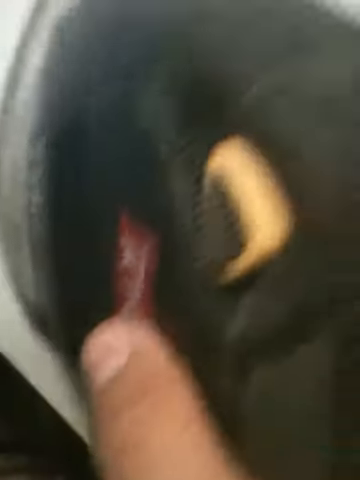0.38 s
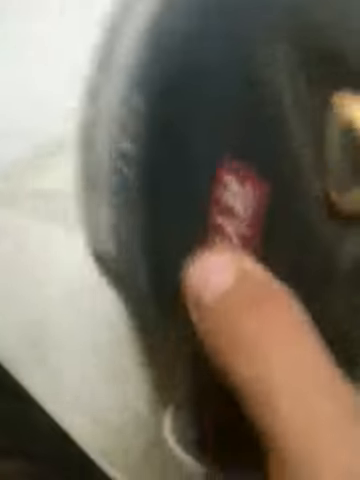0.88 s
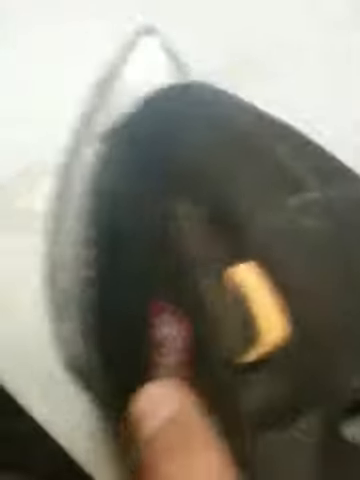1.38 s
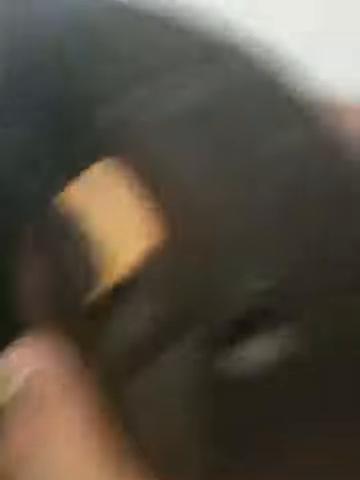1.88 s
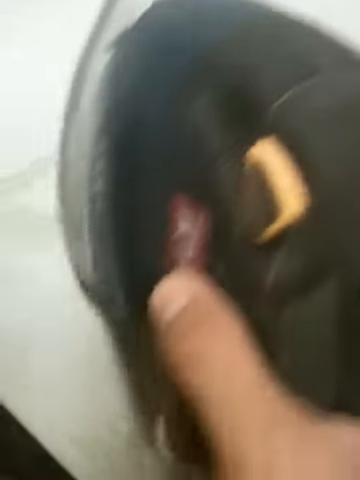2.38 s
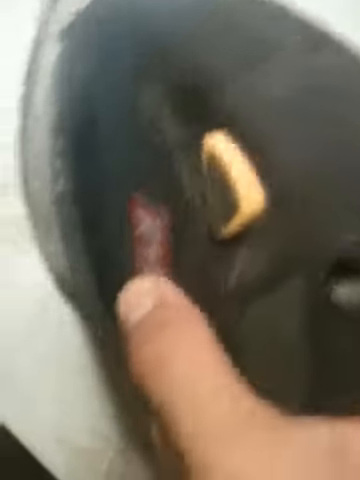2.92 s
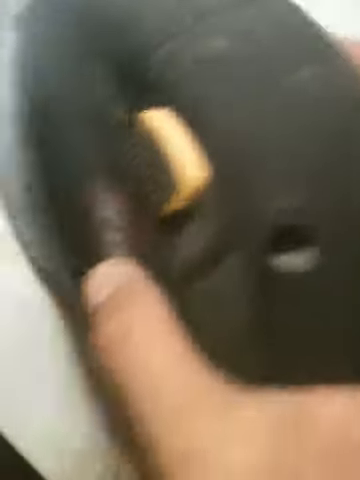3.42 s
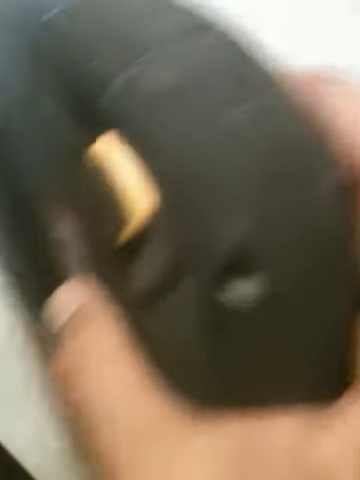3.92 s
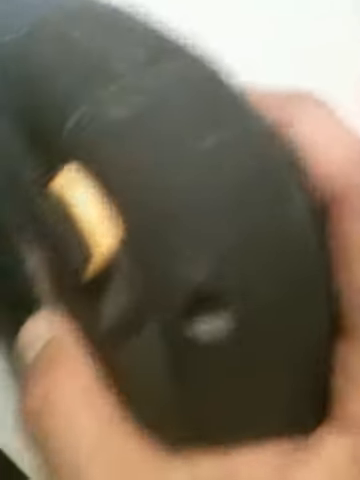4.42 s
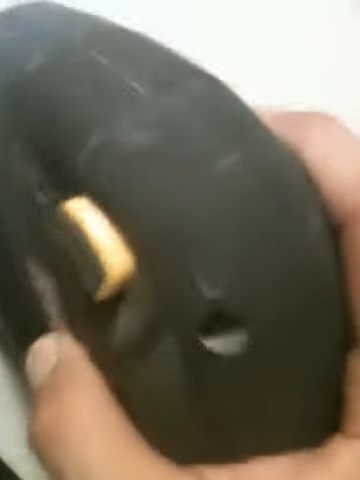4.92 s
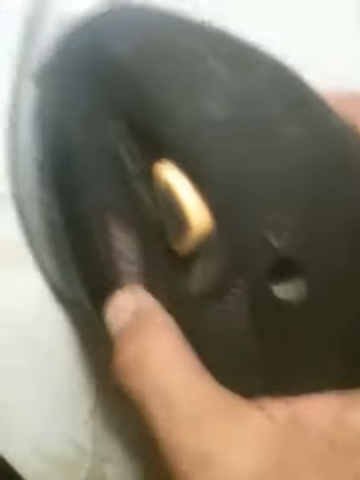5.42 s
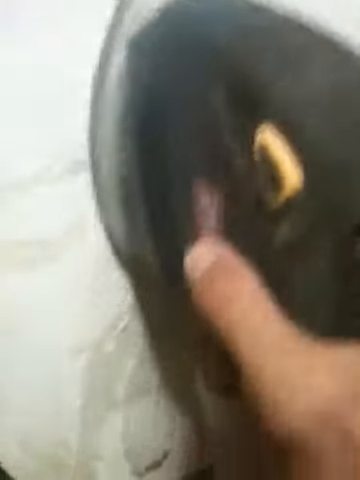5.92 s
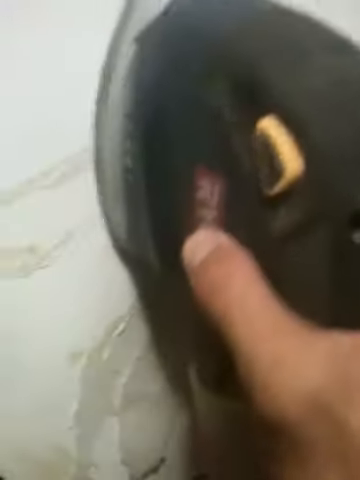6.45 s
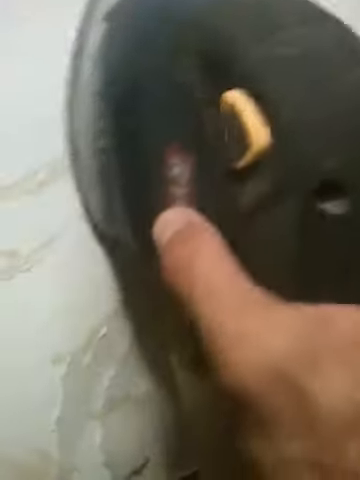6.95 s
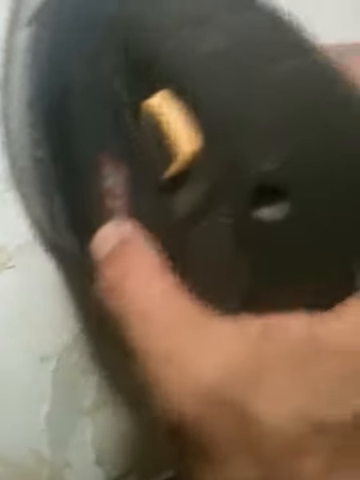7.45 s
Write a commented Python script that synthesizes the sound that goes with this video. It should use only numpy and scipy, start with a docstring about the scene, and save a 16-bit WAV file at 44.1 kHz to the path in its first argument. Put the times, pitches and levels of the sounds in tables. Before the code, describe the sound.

Continuous power-tool noise, near and dry, already running at the start and still running at the end. The motor's low buzz wavers in strength, with shifting metallic whines above it. Rough sanding hiss and rushing cooling air fill the upper range, easing for a moment where the hand slows, later becoming more even while the hum weakens and flutters.

```python
"""A humming motor and a bright hiss: a small orbital sander on a painted wall, close to a mono microphone.
The off-centre shaft hums once a turn; armature slots, commutator, fan and bearing sing multiples of it.
Grit scratches the paint as a bright hiss, which dips at turns of the stroke in the first five seconds.
Cooling air roars through the ringing housing. Tones are phase-locked sines; hiss and roar are shaped noise."""
import sys
import numpy as np
from scipy import signal
from scipy.io import wavfile
from scipy.ndimage import uniform_filter1d, map_coordinates

SR = 44100
rng = np.random.default_rng(int(sys.argv[2]) if len(sys.argv) > 2 else 0)


def decibels_to_gain(level_db):
    """Convert a level in decibels to a linear amplitude gain (20 dB per decade)."""
    exponent = np.asarray(level_db, float) / 20
    return 10 ** exponent


def generate_wav(sig):
    """Save sig (samples, or channels by samples) to the path in sys.argv[1] as 16-bit PCM at SR."""
    pcm = np.round(np.clip(np.atleast_2d(sig).T, -1, 1) * 32767).astype(np.int16)
    wavfile.write(sys.argv[1], SR, pcm)


N = 333837

# Shaft speed, dragged down by the load: t/s, f/Hz (turns per second)
SHAFT_SPEED = [(0, 192.9), (.3, 192.75), (.72, 193.05), (1.3, 192.45), (1.68, 191.5), (1.95, 191.45),
               (2.52, 190.05), (2.74, 190.35), (3.0, 189.75), (3.18, 190.05), (3.48, 189.6), (3.8, 190.75),
               (4.1, 189.85), (4.42, 190.35), (4.68, 189.9), (4.92, 190.4), (5.28, 189.8), (5.56, 190.25),
               (6.0, 188.8), (6.36, 188.6), (6.6, 187.8), (6.84, 187.65), (7.0, 187.1), (7.2, 187.3),
               (7.44, 186.2), (7.57, 186.25)]
# Slow noise levels between pauses: t/s, air roar level/dB, grit body level/dB, grit top level/dB
NOISE_LEVELS = [(0, -24, -22.5, -24.5), (.6, -24, -24.5, -22.5), (.95, -24, -22, -24),
                (1.35, -24.5, -24.5, -22.5), (1.75, -24, -22.5, -24), (2.2, -25.5, -23, -22.5),
                (2.6, -24, -22.5, -24), (3.1, -25, -23, -23.5), (4.2, -25, -23, -25),
                (5.3, -25.5, -24, -25), (5.9, -24.5, -21.5, -23.5), (6.3, -25, -22.5, -24.5),
                (7.57, -26, -23, -25)]


def motor(t, turns):
    """Harmonic synthesis: every tone takes its phase from the one rotating shaft."""
    return hum(t, turns) + whistle(t, turns) + whine(t, turns) + faint_tones(t, turns)


def hum(t, turns):
    """Rotating imbalance: the off-centre shaft forces one cycle a turn, with its octave above."""
    # The hum changes with grip and pressure: t/s, level/dB
    hum_levels = [(0.0, -16), (0.02, -16.5), (0.44, -16), (0.61, -18), (1.16, -15.5), (1.37, -19),
                  (1.77, -16.5), (1.98, -17), (2.09, -21), (2.38, -19), (2.44, -17), (3.73, -16.5),
                  (3.96, -19.5), (4.07, -16.5), (4.58, -18), (4.62, -16), (5.76, -18), (6.11, -23),
                  (6.41, -17.5), (6.49, -19.5), (6.6, -25), (6.77, -18.5), (6.89, -19.5), (7.04, -23.5),
                  (7.17, -20), (7.25, -19), (7.42, -25), (7.55, -22), (7.57, -20)]
    # The octave of the hum: t/s, level/dB
    octave_levels = [(0, -48), (.9, -52.5), (1.12, -43), (1.5, -45.5), (2.0, -55), (2.22, -42.5),
                     (2.6, -51), (3.2, -48), (3.5, -46.5), (4.1, -46), (4.4, -50), (4.6, -43), (5.0, -46.5),
                     (5.5, -45.5), (5.75, -47), (5.95, -38), (6.17, -52), (6.35, -41.5), (6.6, -51),
                     (6.85, -35), (7.05, -42), (7.22, -34), (7.57, -38)]
    # The hum shivers in phase and level as the pad grips and lets go
    shiver_turns = 0.0059 * wander(30)
    shiver_db = 0.34 * wander(25) + 0.36 * wander(40)
    fundamental = tone(turns + shiver_turns, curves(hum_levels, t)[0] + shiver_db)
    octave = tone(2 * turns, curves(octave_levels, t)[0] + 3.7 * wander(14))
    return fundamental + octave


def whistle(t, turns):
    """Amplitude modulation: the 36th harmonic of the shaft swells in bursts above a faint rest level."""
    # Bursts, added to the rest amplitude: middle t/s, length t/s, top level/dB
    swells = [(.1, .25, -41), (.42, 0.3, -27), (.76, .2, -42), (1.213, 0.16, -26), (1.5, .25, -40),
              (2.0, 0.28, -28), (2.363, .2, -38), (2.85, .3, -36), (3.512, 0.27, -29), (3.82, 0.22, -40),
              (4.13, .25, -32), (4.7, 0.6, -33), (5.298, 0.24, -32), (5.79, 0.33, -31.5), (6.2, 0.33, -37),
              (6.76, 0.21, -30.5), (7.09, 0.2, -30), (7.47, .3, -33)]
    rest_db, edge = -49, 1.9
    envelope = decibels_to_gain(rest_db)
    for middle, length, db in swells:
        envelope = envelope + decibels_to_gain(db) * burst(t, middle, length, edge)
    return envelope * tone(36 * turns, 1.5 * wander(20))


def whine(t, turns):
    """Shaft harmonics: the balance of strong overtones shifts as the tool turns in the hand."""
    # Multiples of the shaft frequency, one for each level column below
    multiples = (5, 12, 24, 34, 48)
    # Strong tones: t/s, then level/dB of x5, x12, x24, x34, x48
    whine_levels = [(0, -36, -37, -46, -41, -30), (.35, -40, -39, -40, -41, -46),
                    (.7, -37, -32.5, -43, -40, -32), (1.1, -40, -43, -46, -42, -36),
                    (1.45, -38, -33, -36.5, -40, -32), (1.8, -37, -43, -42, -39.5, -35),
                    (2.15, -42, -45, -42, -40, -36), (2.35, -32, -37, -37, -46, -44),
                    (2.6, -33.5, -43, -40, -37, -38), (3.1, -32.5, -38, -36.5, -36.5, -32),
                    (3.5, -35.5, -39.5, -40, -39, -42), (3.9, -33, -34, -43, -37, -38),
                    (4.5, -33.5, -37.5, -39, -38, -44), (5.2, -35.5, -36.5, -46, -38, -50),
                    (5.55, -34.5, -34, -35, -36, -33), (5.8, -43, -36.5, -47, -44, -31),
                    (6.1, -33.5, -38, -39, -37, -35), (6.4, -39.5, -39.5, -40, -39, -44),
                    (6.8, -35.5, -35.5, -38, -43, -32), (7.05, -36, -32, -37, -43, -33),
                    (7.3, -35, -43, -40, -44, -38), (7.57, -36, -37, -37, -46, -30)]
    out = np.zeros(N)
    for multiple, db in zip(multiples, curves(whine_levels, t)):
        out += tone(multiple * turns, db + 1.85 * wander(18))
    return out


def faint_tones(t, turns):
    """Harmonics and sidebands: load lifts some faint tones and damps others, while all fade by chance."""
    # Broken multiples come from the bearing balls: multiple of the shaft, mains ripples added
    tone_orders = [(3, 0), (3.09, 0), (4, 0), (5.09, 0), (6, 0), (7, 0), (8.09, 0), (10, 0), (12, -1),
                   (12, 1), (16, 0), (19, 0), (20, 0), (23, 0), (25, 0), (35, 0), (37, 0), (41, 0), (72, 0)]
    # Same rows: level/dB at free speed, slope/(dB per Hz of speed sag)
    load_levels = [(-41.5, -1.36), (-42.5, -1.45), (-48, 0.9), (-44.5, -0.1), (-43.5, -0.8), (-48.5, 0.36),
                   (-49, 0.2), (-48.5, -0.5), (-43, -0.06), (-44, .3), (-47.5, -0.3), (-46, -.9),
                   (-42.5, 0.04), (-48, 0.7), (-46.5, -0.05), (-45, -1.5), (-45, 0.1), (-41, -0.8),
                   (-45, -1)]
    ripple_hz = 120
    free_hz = 193  # speed under the lightest load
    sag_hz = free_hz - curves(SHAFT_SPEED, t)[0]
    out = np.zeros(N)
    for (multiple, ripples), (db, db_per_hz) in zip(tone_orders, load_levels):
        phase = multiple * turns + ripples * ripple_hz * t
        chance_db = 2.9 * wander(3.485) + 2.5 * wander(13)
        out += tone(phase, db + db_per_hz * sag_hz + chance_db)
    return out


def grit(t, turns, hz, frames):
    """Random excitation: countless grains scratch the paint, and the orbiting pad pulses them once a turn."""
    # Relative spectrum of the body of the hiss: f/Hz, level/dB per Hz
    body_shape = [(3000, -14), (5500, -6), (7000, -1), (10000, -2), (11500, -12.5), (14000, -39)]
    # Relative spectrum of the top of the hiss: f/Hz, level/dB per Hz
    top_shape = [(8000, -23), (10500, 2.5), (12000, 3), (13500, 2), (14700, -1), (15800, -9.5)]
    top_share = 0.76  # share of the pause depth
    _, body_db, top_db = curves(NOISE_LEVELS, t)
    pause_db = pauses(t)
    steady = np.zeros((len(frames), 1))  # the same shape in every frame
    body = decibels_to_gain(body_db + pause_db) * noise(read(body_shape, hz) + steady, patchy_db=1.46)
    top = decibels_to_gain(top_db + top_share * pause_db) * noise(read(top_shape, hz) + steady, patchy_db=1.4)
    pulse = 1 + 0.1 * np.cos(2 * np.pi * turns)
    return (body + top) * pulse * decibels_to_gain(0.5 * wander(30))


def air(t, turns, hz, frames):
    """Turbulence filtered by resonance and echo interference: fan roar throbs chiefly twice a turn."""
    # Relative spectrum of the air and housing noise: f/Hz, level/dB per Hz
    roar_shape = [(60, -49), (100, -16), (150, -2), (250, -5.5), (330, -11), (400, -5.5), (520, -11.5),
                  (600, -3.5), (950, 0.5), (1500, -0.5), (2900, -3), (4500, -1.5), (6500, -4.5),
                  (15000, -26)]
    # Broad rings of the housing, below 0 dB a dip: f/Hz, width f/Hz, level/dB
    housing_rings = [(854, 350, 2), (2450, 180, 2.5), (2895, 390, 6), (3480, 380, 4), (4560, 300, -1),
                     (6600, 590, -8)]
    pause_share = 0.14  # share of the pause depth
    rings = sum(db * hump(hz, f, width) for f, width, db in housing_rings)
    shape_db = read(roar_shape, hz) + rings + echo_notches(hz, frames)
    roar = noise(shape_db, patchy_db=1.28)
    once = 0.027 * np.cos(2 * np.pi * turns)
    twice = 0.1 * np.cos(2 * np.pi * (2 * turns + 0.36))
    level = decibels_to_gain(curves(NOISE_LEVELS, t)[0] + pause_share * pauses(t))
    return level * roar * (1 + once + twice)


def echo_notches(hz, frames):
    """Destructive interference: echoes off wall and hand cancel bands that shift as the tool moves."""
    # Notches at share 1 and stretch 1: f/Hz, level/dB
    notches = [(2750, -3.5), (3320, -9), (3960, -7.5), (4950, -13.5)]
    # Depth of all notches: t/s, share
    depth_share = [(0, 0.3), (1.8, 0.54), (3.3, 0.52), (4.8, 1.6), (5.5, 1.05), (5.9, 0.22), (7.57, 0.61)]
    # Place of all notches: t/s, factor on f
    place_stretch = [(0, .95), (1.8, .975), (3.3, .995), (4.8, 1.01), (7.57, 1.015)]
    share = curves(depth_share, frames)[0][:, None]
    stretch = curves(place_stretch, frames)[0][:, None]
    return share * sum(db * hump(hz, f * stretch, width_hz=130) for f, db in notches)


def pauses(t):
    """Less rubbing, less noise: the level change in dB where the hand slows and turns."""
    # Dips of the grit body: middle t/s, length t/s, level/dB
    stroke_turns = [(0, 0.071, -4.5), (0.424, .18, -3), (.74, .14, -1), (1.185, 0.15, -4),
                    (1.46, 0.12, -1.5), (1.975, 0.16, -4), (2.415, 0.11, -2), (2.86, 0.17, -3),
                    (3.353, 0.27, -3), (3.95, .24, -2.5), (4.516, 0.34, -1.5), (5.12, 0.31, -2)]
    edge = 9.3
    return sum(db * burst(t, middle, length, edge) for middle, length, db in stroke_turns)


def burst(t, middle, length, edge):
    """Envelope from 0 to 1 and back, 0.5 at the ends of the length; edge 2 = bell, more = flat top."""
    return 2.0 ** -(abs(2 * (t - middle) / length) ** edge)


def hump(hz, centre_hz, width_hz):
    """Bell-shaped resonance curve of height 1 on a frequency axis; the width is two standard deviations."""
    return np.exp(-((hz - centre_hz) / width_hz) ** 2 * 2)


def tone(turns, db):
    """Pure tone from its phase in cycles, at an rms level in dB and with a random starting phase."""
    return np.sqrt(2) * decibels_to_gain(db) * np.sin(2 * np.pi * (turns + rng.random()))


def noise(shape_db, patchy_db):
    """Spectral synthesis: random short-time spectra under a shape (frames x bins) with drifting patches."""
    real, imaginary, patches = rng.standard_normal((3,) + shape_db.shape)
    patches = uniform_filter1d(patches, size=20, axis=1)  # across frequency
    patches = evened(uniform_filter1d(patches, size=24, axis=0))  # across time
    spectra = (real + 1j * imaginary) * decibels_to_gain(shape_db + patchy_db * patches)
    return evened(signal.istft(spectra.T, nperseg=2048, noverlap=1536)[1][:N])


def wander(per_s):
    """Band-limited fluctuation: slow chance of rms about 1, smooth over 1 / per_s seconds."""
    knots = rng.standard_normal(1000)
    t = np.arange(0, N + 32, 32) / SR
    slow = map_coordinates(knots, [t * per_s], order=3, mode="mirror")
    return np.interp(np.arange(N) / SR, t, slow)


def evened(x):
    """Power normalisation to rms 1."""
    return x / np.sqrt(np.mean(x ** 2) + 1e-20)


def read(points, hz):
    """Spectrum in dB interpolated along logarithmic frequency."""
    f, value = np.transpose(points)
    return np.interp(np.log(hz + 1), np.log(f + 1), value)


def curves(table, t):
    """Linear interpolation in time of each column after the first."""
    s, *columns = np.transpose(table)
    return [np.interp(t, s, column) for column in columns]


def scene():
    """Superposition: motor, grit and air add at one microphone, which feeds both channels."""
    t = np.arange(N) / SR
    turns = np.cumsum(curves(SHAFT_SPEED, t)[0]) / SR
    hz = np.fft.rfftfreq(2048, 1 / SR)
    frames = np.arange(N // 512 + 5) * 512 / SR  # times of the noise spectra
    mono = motor(t, turns) + grit(t, turns, hz, frames) + air(t, turns, hz, frames)
    return np.array([mono, mono])


def roll_off(x):
    """The treble ends steeply here."""
    return signal.sosfilt(signal.butter(12, 15740, fs=SR, output="sos"), x)


def record(dry):
    """High-pass filtering: the microphone loses the deepest bass, below about 110 Hz."""
    bass_cut = signal.butter(2, 110, "high", fs=SR, output="sos")
    mix = signal.sosfilt(bass_cut, dry)
    return roll_off(mix)


dry = scene()
out = record(dry)
generate_wav(out)
```